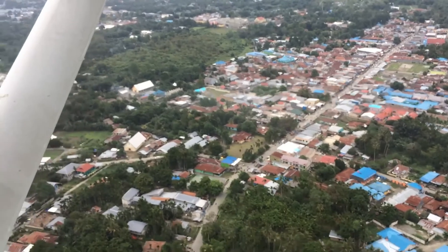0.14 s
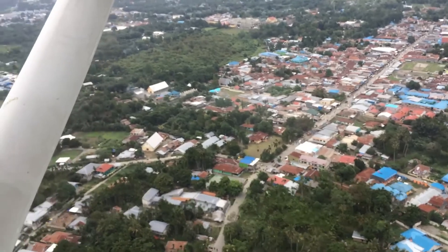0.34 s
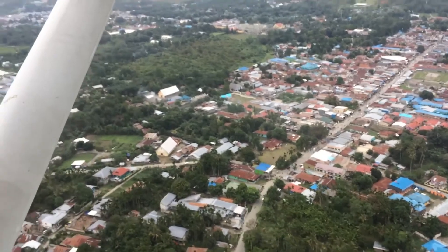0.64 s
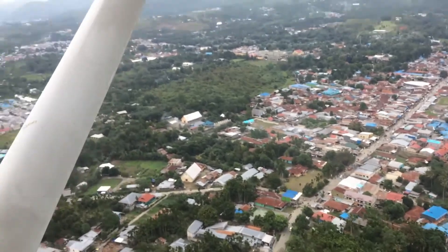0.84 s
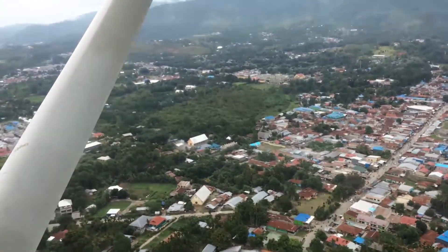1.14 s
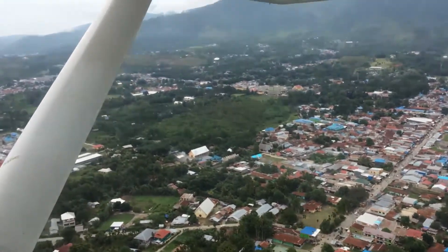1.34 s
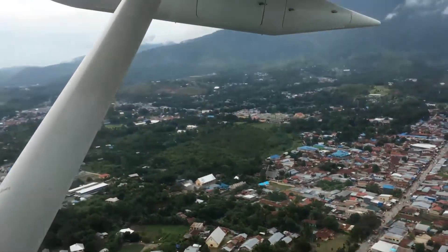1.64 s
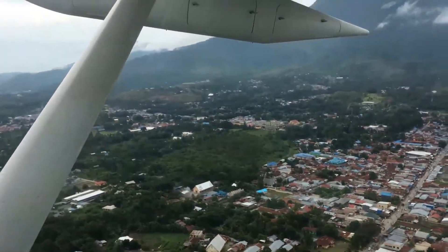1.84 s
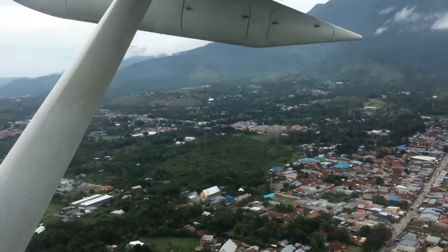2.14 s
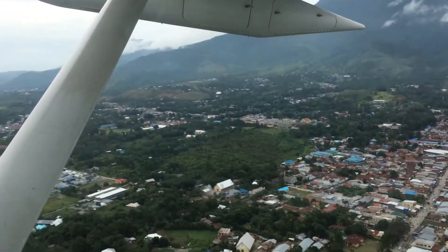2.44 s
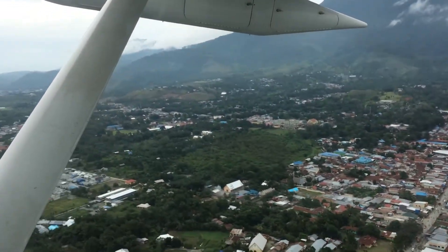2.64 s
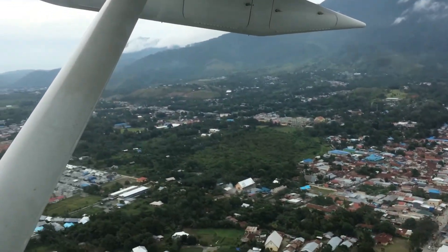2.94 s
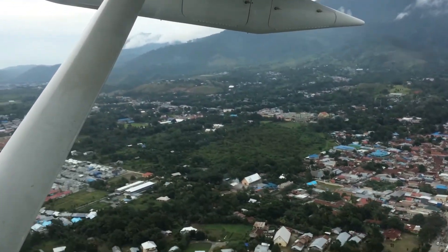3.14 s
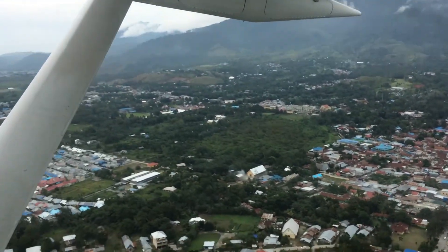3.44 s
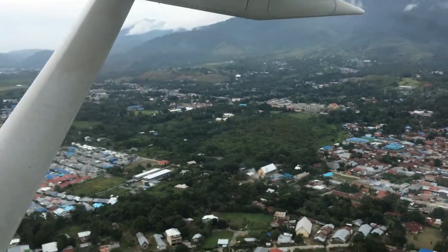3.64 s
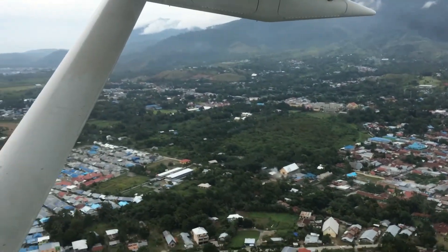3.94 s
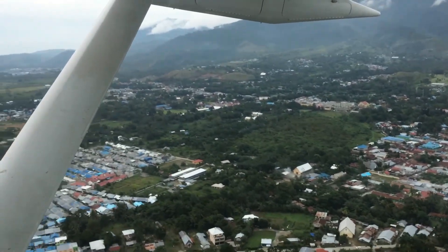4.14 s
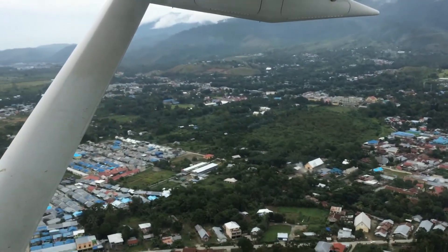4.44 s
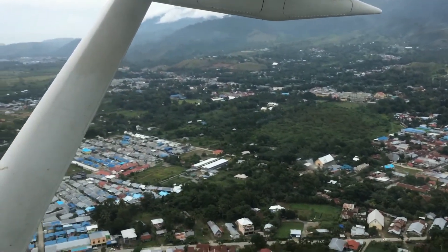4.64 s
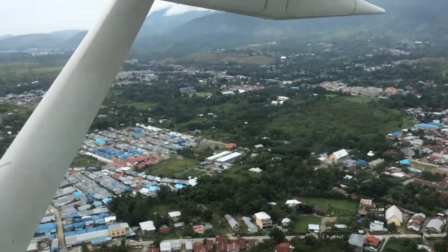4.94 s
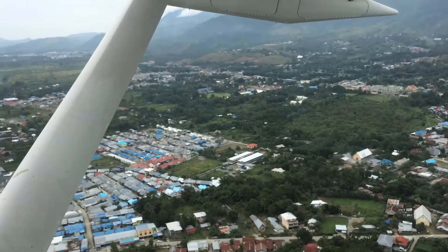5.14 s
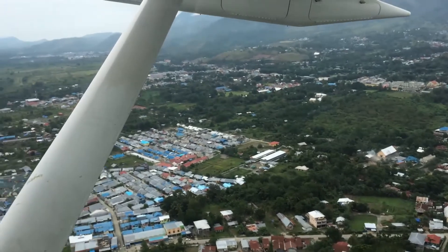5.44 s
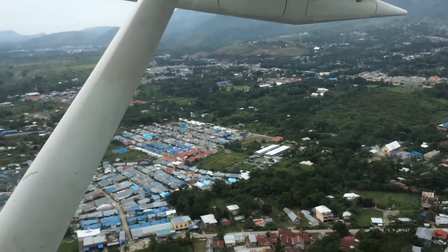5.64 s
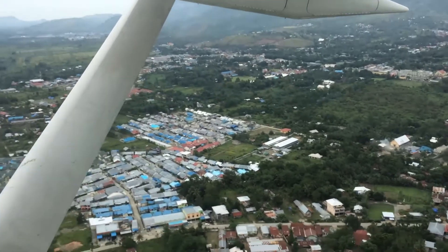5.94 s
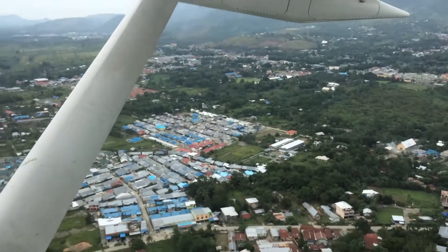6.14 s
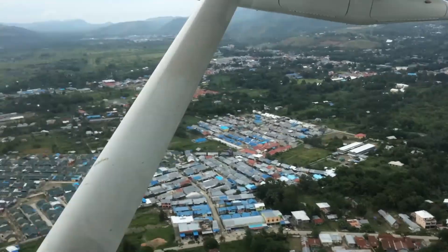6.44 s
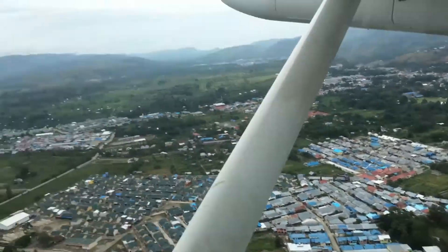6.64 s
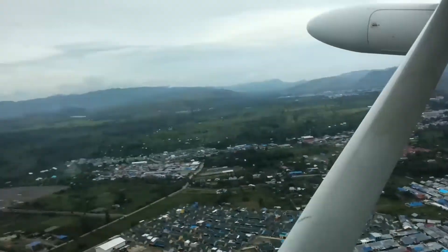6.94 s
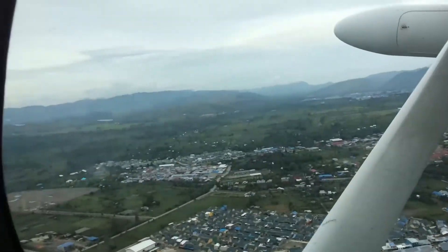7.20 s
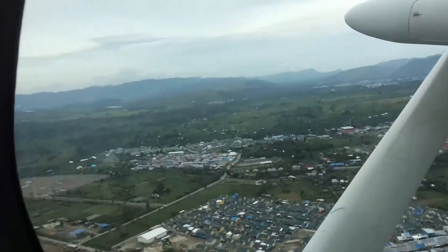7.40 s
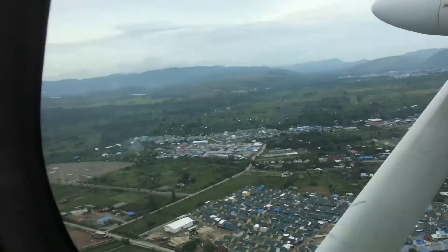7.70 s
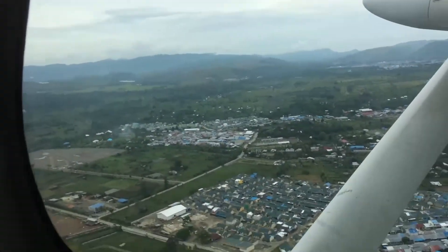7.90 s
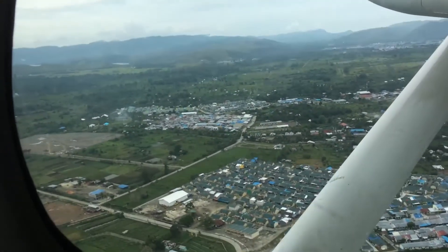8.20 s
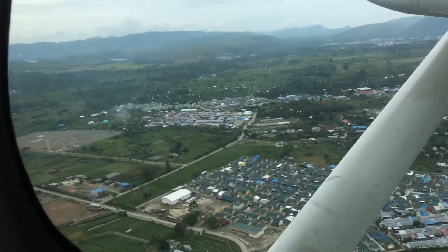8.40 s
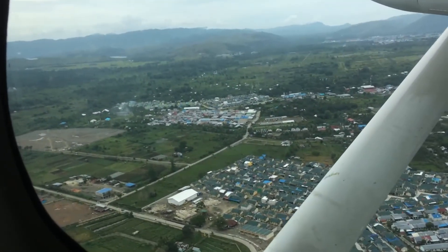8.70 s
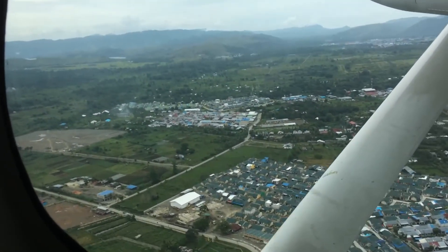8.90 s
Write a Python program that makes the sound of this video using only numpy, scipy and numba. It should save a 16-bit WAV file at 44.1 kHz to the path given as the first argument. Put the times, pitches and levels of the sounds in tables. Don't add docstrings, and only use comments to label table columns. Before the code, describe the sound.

A loud unbroken small-aircraft cabin roar captured close to the window by a handheld phone. Low propeller hum around one hundred and two hundred hertz beats unevenly over turbulent hull rumble; a gearbox hum and muted wind rush fill the middle, with a thin compressor whine high above. Near five seconds the upper hum dips and the whine weakens, then returns after six as the phone turns and the hiss changes colour.

```python
import sys
import numpy as np
from scipy import signal
from scipy.fft import rfft, irfft, next_fast_len
from scipy.io import wavfile
from scipy.ndimage import uniform_filter1d, minimum_filter1d
from numba import njit

SR = 44100
rng = np.random.default_rng(int(sys.argv[2]) if len(sys.argv) > 2 else 0)


def waveform_to_disk(signal):
    frames = np.transpose(np.atleast_2d(signal))
    scaled = np.clip(frames, -1, 1) * 32767
    samples = np.round(scaled).astype(np.int16)
    wavfile.write(sys.argv[1], SR, samples)


def convert_level_to_amplitude(level_db):
    exponent = np.asarray(level_db, float) / 20
    return 10 ** exponent


N = 399546

LEAN_S, LEAN_LENGTH_S = 5.06, 0.34
TURN_S, TURN_LENGTH_S = 6.6, 0.78
SHAFT_HZ, GEAR_HZ, WHINE_HZ = 33.235, 332.8, 9497.4

# f/Hz, density/dB per Hz
HISS_FACING = [(400, -7), (900, -9), (1500, -11.5), (2100, -16), (2900, -23.5), (4000, -26), (5500, -30),
               (6800, -35), (8500, -35), (11000, -37), (13000, -38.5), (15200, -42)]
HISS_TURNED = [(400, -6.5), (900, -9), (1500, -13.5), (2050, -13.5), (2900, -22), (4000, -26.5),
               (5350, -30), (6500, -30), (8500, -31.5), (11000, -35), (13000, -39.5), (15200, -43)]
# f/Hz, width/Hz, level/dB per Hz
PANE_FACING = [(660, 216, 0.5), (1050, 173, -4.5), (1390, 97, -16), (1697, 160, -7), (1847, 150, -8),
               (2417, 290, -12.5), (3087, 116, -18), (3510, 320, -17.5), (4100, 280, -25.5),
               (4800, 100, -29), (6440, 250, -34)]
PANE_TURNED = [(655, 270, -0.5), (1047, 150, -4), (1376, 89, -6), (1730, 270, -10.5), (2480, 330, -14),
               (3400, 350, -18.5), (5000, 260, -33.5), (5700, 300, -31.5), (7250, 350, -29),
               (8000, 200, -42)]
# f/Hz, width/Hz, depth/0-1
GAPS_FACING = [(932, 44, 0.9), (1205, 55, 0.5), (1600, 70, 0.44), (2140, 62, 0.64), (2850, 80, 0.5),
               (3160, 50, 0.65), (3750, 90, 0.2), (4440, 220, 0.6), (5530, 110, 0.2), (6650, 160, 0.2),
               (9050, 200, 0.2)]
GAPS_TURNED = [(940, 39, 0.65), (1690, 34, 0.44), (2020, 120, 0.95), (2760, 110, 0.96), (4050, 80, .4),
               (4700, 90, .6), (5460, 250, .7), (6100, 120, 0.56), (7050, 150, .5), (7850, 150, .4),
               (9150, 200, .4)]
# start t/s, end t/s, f/Hz, width/Hz, level/dB
SHIFTS = [(0, 3.2, 6780, 200, 2), (1.9, 4.6, 4700, 120, 4), (4.9, 6.5, 9000, 250, 3),
          (5.1, 6.55, 7200, 350, 1), (5.2, 6.3, 6620, 200, -5), (5.5, 8.2, 3540, 300, -0.5),
          (6.4, 7.6, 5150, 300, -6), (6.4, 6.9, 8620, 204, -4), (6.7, 7.6, 8080, 250, 3.5),
          (7.299, 6.6, 5450, 220, -1), (7.9, 8, 7450, 380, 3.5), (7.9, 8.7, 7050, 180, -6),
          (8, 9.7, 2820, 100, -10)]
# f/Hz, density/dB per Hz
HULL_DRUMMING = [(20, -24), (40, -9.5), (55, -6.5), (80, -1), (115, 2), (140, 2), (170, 0.5), (190, 3),
                 (215, -2.5), (260, -7.5), (310, -9), (350, -12), (440, -19.5), (540, -31.5)]
# f/Hz, width/Hz, level/dB per Hz
CABIN_BOOM = [(64, 7.4, -1), (132.4, 17, -3.5), (192, 16, -10.5), (294, 28, -7)]
# t/s, level/dB
WHINE_SHADING = [(0, -54), (0.8, -56), (1.3, -54), (3.4, -54.5), (4.6, -54), (5.05, -55), (5.3, -61),
                 (6.05, -62), (6.35, -54), (7.1, -55), (7.6, -52), (8.2, -57), (8.7, -54), (9.06, -56)]
# multiple, level/dB
SHAFT_ORDERS = [(2, -22.5), (4, -24), (5, -29.5), (7, -29), (9, -32.5), (14, -46.5), (15, -42.5), (20, -65),
                (21, -46), (23, -45)]
# shaft multiple, level before the lean/dB, level after/dB
BLADES = [(3, -15.5, -18), (6, -16, -17), (12, -33, -32), (18, -42.5, -39)]
# t/s, length/s, shaft multiple, depth/dB
NODES = [
    (3.08, .5, 6, -10),
    (4.3, 0.34, 6, -7.5),
    (5.46, 0.7, 6, -22),
    (7.597, 0.63, 6, -6),
    (8.453, 0.57, 6, -7),
    (3.8, .7, 12, -17),
]


def unit(x):
    return x / np.sqrt(np.mean(x ** 2))


def walk(rate):
    count = int(N / SR * rate) + 4
    fine = np.repeat(rng.standard_normal(count), 8)
    fine = uniform_filter1d(fine, size=8)
    fine = unit(uniform_filter1d(fine, size=8))
    return np.interp(np.arange(N) * (8 * rate / SR) + 8, np.arange(len(fine)), fine)


def moved(at_s, length_s):
    return np.clip((np.arange(N) / SR - at_s) / length_s + .5, 0, 1)


def tone(hz, db, drift_rad, wobble_db, rate):
    phase = 2 * np.pi * (hz * np.arange(N) / SR + rng.random()) + drift_rad * walk(rate)
    return np.sqrt(2) * convert_level_to_amplitude(db + wobble_db * walk(rate)) * np.sin(phase)


def bins():
    size = next_fast_len(N)
    return np.arange(1, size // 2 + 2) * SR / size


def power(spectrum, peaks=(), gaps=()):
    hz = bins()
    f, db = np.transpose(spectrum)
    total = convert_level_to_amplitude(np.interp(np.log(hz), np.log(f), db, left=-90)) ** 2
    above = hz > f[-1]
    total[above] *= (f[-1] / hz[above]) ** 4
    for centre, width, peak_db in peaks:
        total += convert_level_to_amplitude(peak_db) ** 2 / (1 + (2 * (hz - centre) / width) ** 2) ** 2
    for centre, width, depth in gaps:
        total *= 1 - min(depth, .95) / (1 + (2 * (hz - centre) / width) ** 2)
    return total


def quick_walk(rate):
    w = walk(rate)
    return w - uniform_filter1d(w, size=SR // 4)


def turbulence(powers, shares, span, shared_db, flicker_db, rate):
    octave = np.log2(bins() / 20)
    size = next_fast_len(N)
    white = rfft(rng.standard_normal(size))
    gusts_db = shared_db * quick_walk(rate)
    out = np.zeros(N)
    for centre in np.arange(*span, .5):
        mask = np.cos(np.pi * np.clip(octave - centre, -.5, .5)) ** 2
        band = np.zeros(N)
        for share, p in zip(shares, powers):
            band += share * irfft(white * mask * np.sqrt(p), size)[:N]
        out += band * convert_level_to_amplitude(gusts_db + flicker_db * quick_walk(rate))
    return unit(out)


def shifted(x):
    t = np.arange(N) / SR
    for start, end, hz, width, db in SHIFTS:
        share = np.clip(np.minimum(t - start, end - t) / .15 + .5, 0, 1)
        band = signal.lfilter(*signal.iirpeak(hz, hz / width, SR), x)
        x = x + share * (convert_level_to_amplitude(db) - 1) * band
    return x


def window_hiss():
    turned = moved(TURN_S, TURN_LENGTH_S)
    facing_colour = power(HISS_FACING, PANE_FACING, GAPS_FACING)
    turned_colour = power(HISS_TURNED, PANE_TURNED, GAPS_TURNED)
    hiss = turbulence([facing_colour, turned_colour], [1 - turned, turned], (4, 10), 0.51, 0.99, 20.)
    before_db, leaned_db = -24.5, -24.5
    db = before_db + (leaned_db - before_db) * moved(LEAN_S, LEAN_LENGTH_S)
    return convert_level_to_amplitude(db) * shifted(hiss)


def hull_drumming():
    return convert_level_to_amplitude(-9.5) * turbulence([power(HULL_DRUMMING, CABIN_BOOM)], [1], (0, 6), 0.83, 1.65, 14.)


def compressor():
    t = np.arange(N) / SR
    db = np.interp(t, *np.transpose(WHINE_SHADING))
    out = tone(WHINE_HZ, db, 0.69, 1.3, 22.)
    out += tone(WHINE_HZ + 3 * SHAFT_HZ, -72, .6, 2.5, 15.)
    carrier = np.exp(2j * np.pi * WHINE_HZ * t)
    for rate, skirt_db in ((120, db - 8), (500, db / 2 - 29)):
        out += convert_level_to_amplitude(skirt_db) * (carrier * (walk(rate) + 1j * walk(rate))).real
    return out


def heard_db(k, before_db, after_db):
    db = before_db + (after_db - before_db) * moved(LEAN_S, LEAN_LENGTH_S)
    for s, length, multiple, depth_db in NODES:
        if round(multiple) == k:
            db = db + depth_db * np.exp(-(2 * (np.arange(N) / SR - s) / length) ** 2)
    return db


def propeller():
    out = np.zeros(N)
    for multiple, before_db, after_db in BLADES:
        k = round(multiple)
        out += tone(k * SHAFT_HZ, heard_db(k, before_db, after_db), 0.35, 1.86, 12.)
    for multiple, db in SHAFT_ORDERS:
        out += tone(round(multiple) * SHAFT_HZ, db - .7, 0.46, 1.5, 7.)
    gear_db, gear_turned_db = -22.5, -25
    gear_db = gear_db + (gear_turned_db - gear_db) * moved(TURN_S, TURN_LENGTH_S)
    out += tone(GEAR_HZ, gear_db, 1.34, 1.74, 6.)
    return convert_level_to_amplitude(0.65) * out


def scene():
    mix = window_hiss() + hull_drumming() + compressor() + propeller()
    return convert_level_to_amplitude(0.82) * mix[None]


@njit
def envelope(x, release):
    e, out = 1., np.empty(len(x))
    for i in range(len(x)):
        e = max(x[i], e + (x[i] - e) * release)
        out[i] = e
    return out


def limit(x, top, ratio, ahead_s, release_s):
    k = int(ahead_s * SR)
    coming = -minimum_filter1d(-np.abs(x), 2 * k + 1)
    e = np.maximum(envelope(coming, 1 / (release_s * SR)), top)
    return x * uniform_filter1d((top / e) ** (1 - 1 / ratio), k)


def roll_off(x):
    return signal.sosfilt(signal.butter(12, 15240, fs=SR, output="sos"), x)


def record(dry):
    x = limit(dry[0], top=0.57, ratio=1.517, ahead_s=0.01, release_s=0.054)
    x = limit(x * convert_level_to_amplitude(1.5), top=.991, ratio=40., ahead_s=.002, release_s=.008)
    mix = np.clip(x, -1, 1)[None]
    return roll_off(mix)


dry = scene()
out = record(dry)
waveform_to_disk(out)
```